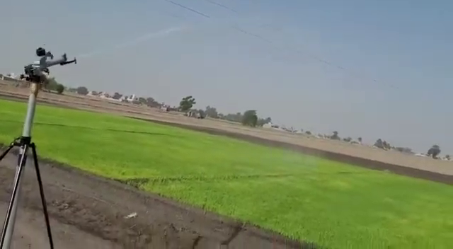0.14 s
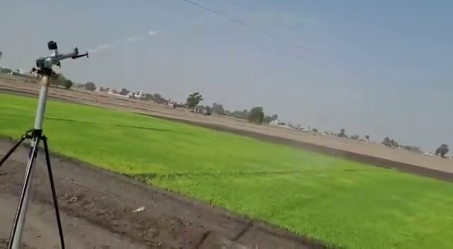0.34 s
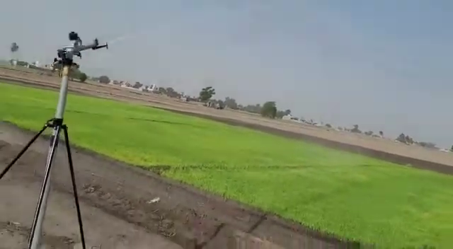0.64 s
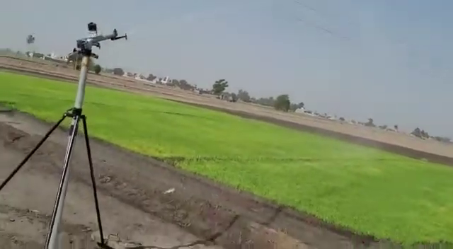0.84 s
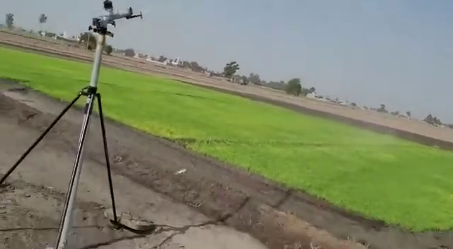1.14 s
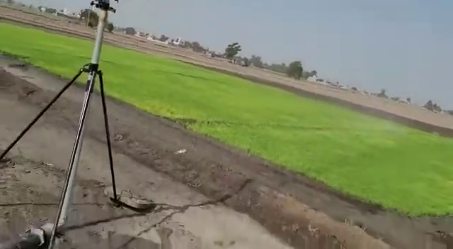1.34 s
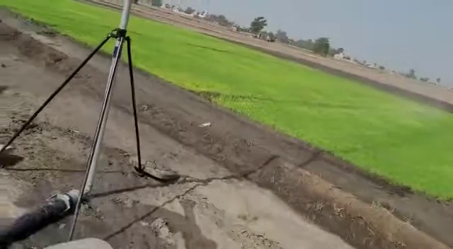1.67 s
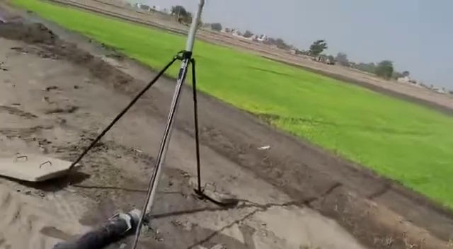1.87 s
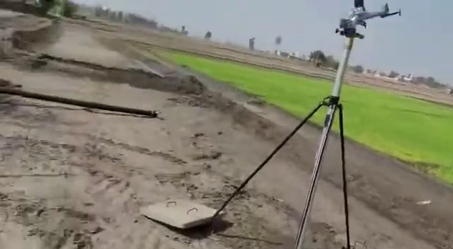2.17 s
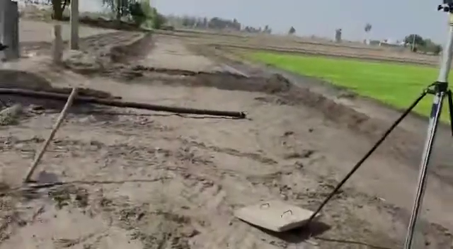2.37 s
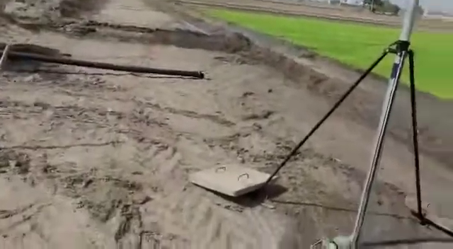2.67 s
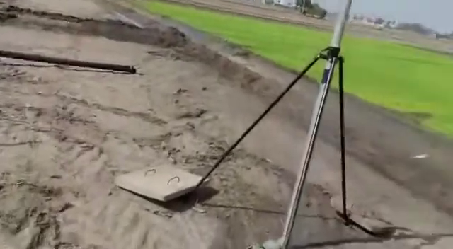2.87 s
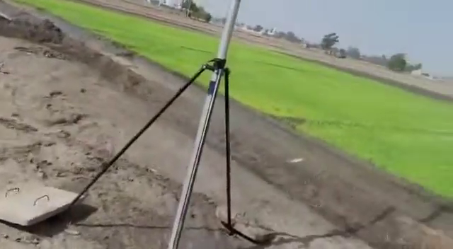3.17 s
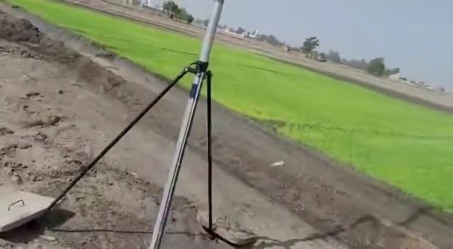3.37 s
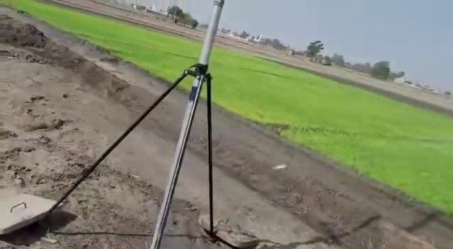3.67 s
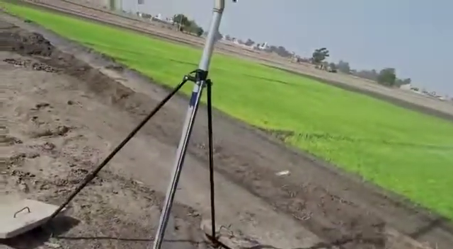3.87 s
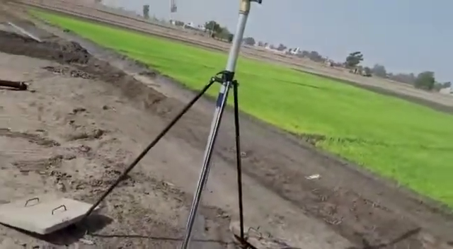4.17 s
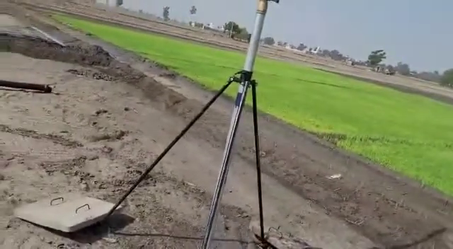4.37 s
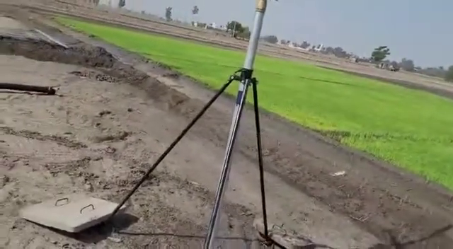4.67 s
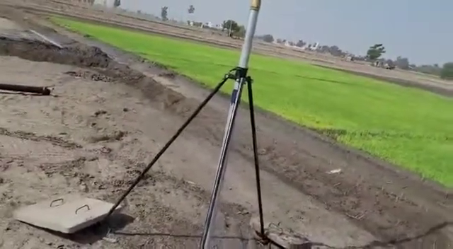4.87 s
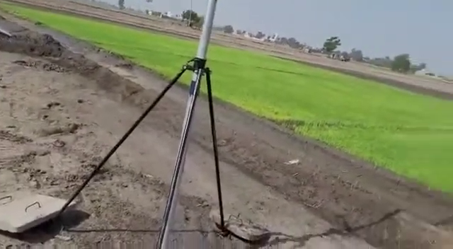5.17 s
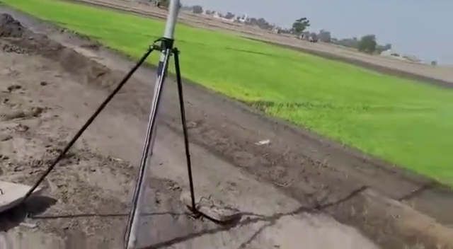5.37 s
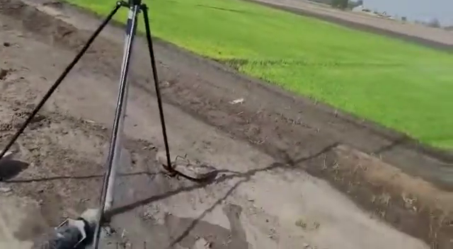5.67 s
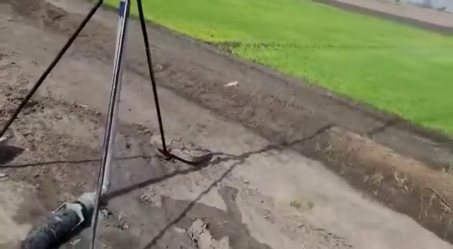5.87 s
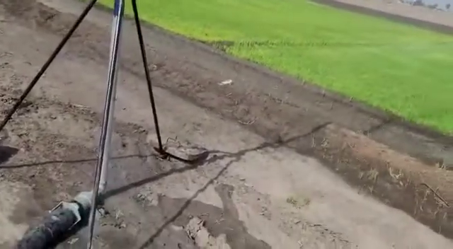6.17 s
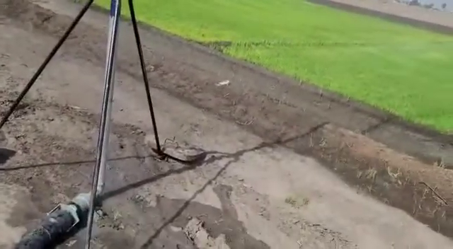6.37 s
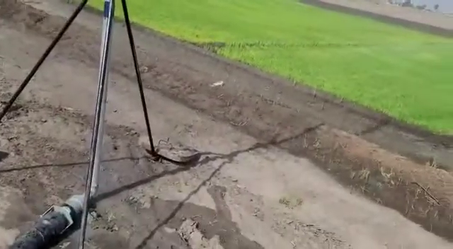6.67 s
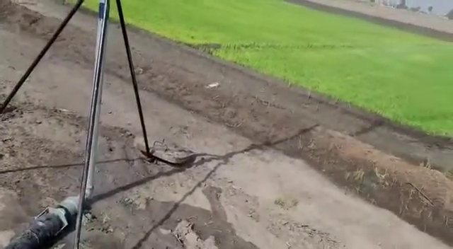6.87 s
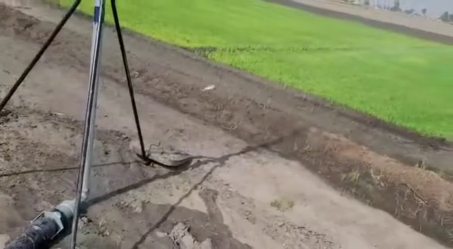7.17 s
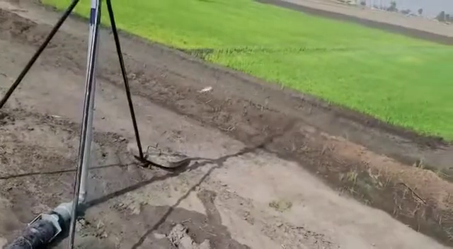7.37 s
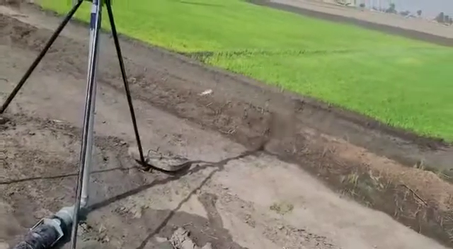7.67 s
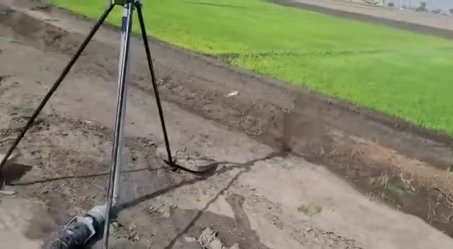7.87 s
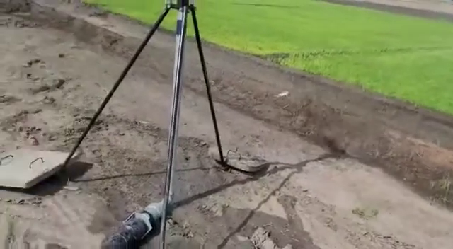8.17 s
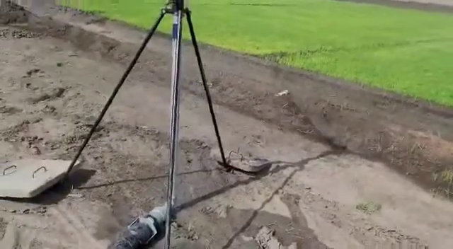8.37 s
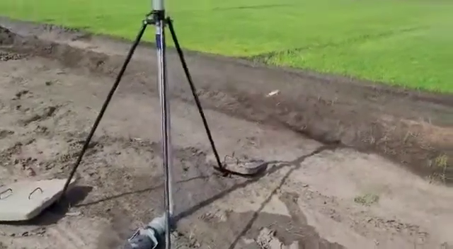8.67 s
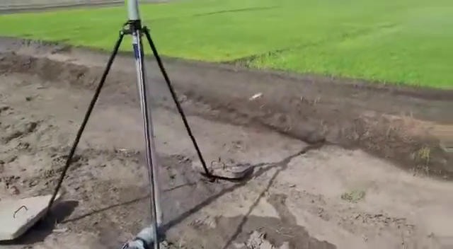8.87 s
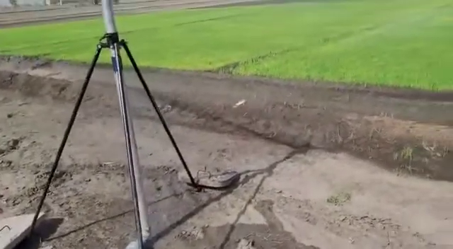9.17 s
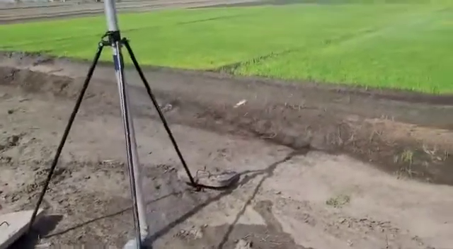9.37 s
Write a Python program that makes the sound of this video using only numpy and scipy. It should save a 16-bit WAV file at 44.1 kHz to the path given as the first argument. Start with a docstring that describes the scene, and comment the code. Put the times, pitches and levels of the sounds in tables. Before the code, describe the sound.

Outdoors in an open field, a handheld phone catches lumpy low wind and dull thumping buffets. A sprinkler's metal arm strikes its water jet about twice a second, each blow a splash, short clack and brief ring, over a growing, crackling hiss. At about seven seconds it breaks into quick chatter, ten blows a second with watery swishes between, then stops; a last gust and one loud slow clack follow.

```python
"""Rain gun in a windy field

Gusty wind buffets a two-port phone: layers of lumpy low noise, with dull thumps for the hardest buffets.
The water jet hisses (flickering noise in three bands) and spits (ticks a few cycles long).
A metal arm strikes the jet twice a second: a noise splash, a short barrel clack and a longer ring.
Then the gun swings back and the blows come ten times a second, with swishes between them."""
import sys
import numpy as np
from scipy import signal
from scipy.fft import rfft, irfft, next_fast_len
from scipy.io import wavfile
from scipy.ndimage import uniform_filter1d, map_coordinates

SR = 44100
rng = np.random.default_rng(int(sys.argv[2]) if len(sys.argv) > 2 else 0)


def transcribe(signal):
    """Save signal, clipped to [-1, 1], as a 16-bit WAV file at the path in sys.argv[1]."""
    frames = np.atleast_2d(signal).T
    limited = np.clip(frames, -1, 1)
    pcm = np.round(limited * 32767).astype(np.int16)
    wavfile.write(sys.argv[1], SR, pcm)


N = 420706  # samples in the scene

# blows of the arm, levels before the trims in the code: [t/s, splash level of the middle/dB, of the bass/dB,
# of the treble/dB, lead of the left port in the two lowest arm modes/rad (2 columns),
# level of the five arm modes/dB (5 columns), level of the nine lower barrel modes/dB (9 columns)]
BLOW_TABLE = [(0.198, -27.5, -33, -37, 2.7, 2.0, -45, -36, -43, -51, -46, -46, -46, -37, -45, -46, -36, -53, -41, -37.5),
              (0.715, -27.5, -29.5, -31, -0.5, 1.6, -43, -38, -42, -50, -53, -40, -48, -38, -44, -45, -42, -51, -54, -37),
              (1.232, -25.5, -33, -32, 1.3, -3, -35, -44, -38.5, -51, -55, -34.5, -38, -43, -49, -51, -40, -48, -50, -41),
              (1.749, -23, -21, -33, -0.5, 1.3, -36.5, -34.5, -42, -46, -47, -32, -45, -28.5, -38, -40, -38, -46, -36, -42),
              (2.268, -21, -19.5, -36, -1.7, 1.7, -43, -40, -37, -45, -51, -29, -32, -24, -41, -48, -34, -34, -38, -37),
              (2.789, -21.5, -21, -26, 1, -2.5, -48, -39, -35, -44, -52, -34, -30, -27, -40, -38, -40, -44, -40, -37),
              (3.311, -19, -21, -28, 0, -0.4, -34.5, -33, -35, -48, -39.5, -31.5, -44, -35, -38, -31, -30, -48, -37, -39),
              (3.833, -16.5, -21.5, -25, 0.5, -1, -36.5, -33, -43, -37, -55, -42, -43, -33, -34, -27.5, -27, -39, -33, -35),
              (4.356, -19, -21.5, -34, -1.6, 4, -32.5, -37, -34, -36, -36.5, -35, -35, -31, -40, -38, -21.5, -37, -24, -32),
              (4.878, -17, -20.5, -24, 0.1, -3.5, -27.5, -35, -41, -36, -41, -33, -35, -32, -41, -35, -31, -43, -38, -21.5),
              (5.399, -19.5, -24, -25, 1.0, 3.5, -27.5, -34, -39, -37.5, -46, -38, -32, -36, -37, -31.5, -30, -37, -51, -37),
              (5.924, -19, -20.5, -24.5, 2, 0.4, -27.5, -45, -49, -43, -39, -30.5, -38, -43, -37, -41, -29, -26, -39, -25),
              (6.447, -19, -22, -20.5, 2.0, 5, -27.5, -41, -50, -47, -43, -37, -33, -47, -44, -29.5, -25, -34, -37, -35),
              (6.968, -19, -22, -20, 3, 2, -29, -30, -50, -36, -47, -40, -37, -42, -35, -29, -29, -34, -40, -44),
              (6.998, -23, -35, -34, 2.3, 4, -26, -36, -53, -48, -57, -42, -50, -52, -49, -45, -40, -41, -51, -51),
              (7.007, -28, -29, -31, 2.4, 3.5, -26, -31, -56, -42, -52, -39, -47, -47, -44, -44, -43, -45, -50, -54),
              (7.127, -19.5, -26.5, -30, 2.4, 2.2, -24, -33, -48, -48, -57, -32, -37, -45, -34, -25.5, -33, -21, -40, -50),
              (7.229, -20.5, -26.5, -30, 3.5, 2.5, -26, -28.5, -50, -52, -36, -32, -47, -37, -36, -29, -40, -23, -30, -43),
              (7.332, -22.5, -26, -31, 3, 3, -30, -37, -56, -51, -45, -34, -44, -42, -35, -30, -43, -40, -32, -47),
              (7.431, -25, -26.5, -25, 3.5, 4, -33, -45, -44, -50, -43, -31, -44, -32, -37, -31, -44, -40, -41, -43),
              (7.533, -25, -29.5, -28, -2.5, -1, -36, -47, -44, -52, -44, -33.5, -37, -36, -38, -28, -47, -44, -36, -40),
              (7.633, -30, -27, -27, -1.5, 5, -42, -49, -47, -51, -52, -33, -38, -29.5, -39, -36, -49, -42, -39, -40),
              (7.736, -25.5, -27.5, -23.5, 1.5, 4, -42, -44, -47, -51, -53, -34, -38, -28, -36, -38, -47, -46, -42, -47),
              (7.836, -26, -26, -26.5, 0.4, 1.3, -44, -52, -45, -53, -50, -41, -40, -26, -38, -41, -47, -47, -46, -44),
              (7.933, -26.5, -26.5, -27, 0.1, -7, -44, -46, -44, -45, -49, -37, -34, -28, -32, -36, -48, -49, -43, -40),
              (8.032, -25.5, -25, -28.5, 1, 0.4, -41, -48, -51, -46, -48, -39, -30, -23.5, -26, -40, -45, -41, -46, -38),
              (8.134, -24.5, -30, -25.5, -1, 0.0, -47, -47, -51, -47, -44.5, -35, -27.5, -24, -27.5, -42, -44, -46, -48, -40),
              (8.235, -23, -26.5, -30, -3, -1, -47, -41.5, -50, -45, -50, -39, -29.5, -22, -25, -32, -44, -40, -48, -43),
              (8.335, -22.5, -24.5, -28, 2.8, -0.6, -49, -48, -45, -55, -56, -34, -30, -28, -20.5, -35, -41, -33, -37, -33),
              (8.439, -26.5, -26, -28, -1.7, -5.9, -41, -32.5, -33, -40, -54, -33, -25, -25, -29, -34, -35, -37, -48, -45),
              (8.545, -19.5, -31, -31, 0, -0.9, -40, -42, -41, -47, -51, -38, -26, -28, -27, -39, -32, -32, -41, -49),
              (8.551, -23, -27, -32, -2, -0.4, -44, -47, -41, -50, -55, -40, -42, -25, -21, -28, -38, -41, -44, -49),
              (9.2, -17, -17.5, -28, -0.9, 0.5, -31, -32, -31, -37, -46, -27.5, -28, -12.5, -27, -38, -51, -40, -35, -36)]
# colour of the splash: [f/Hz, level per Hz/dB]
SPLASH_COLOUR = [(290, -29), (500, -1.5), (1400, -3), (3700, -0.5), (4400, -2), (5630, -2.5), (7100, -9.5),
                 (7640, -3.5), (10400, -7), (16000, 0.5)]
# the jet before its flicker: [t/s, level of the low band/dB, level of the middle band/dB]
JET_LEVELS = [(0, -64.5, -59), (1.0, -61.5, -58.5), (2.05, -60.5, -56), (2.8, -56.5, -57.5),
              (3.15, -59, -51), (3.6, -57.5, -53), (4.8, -57.5, -54), (5.05, -51.5, -49.5), (5.6, -53, -53),
              (6.06, -54.5, -51), (6.9, -56.5, -51.5), (7.1, -41, -42), (7.62, -45, -42), (7.95, -44, -51),
              (8.25, -45, -58), (8.45, -43, -39), (8.8, -53, -54.5), (9.54, -52, -55)]
# colour of the hiss: [f/Hz, level per Hz/dB]
HISS_COLOUR = [(350, -46), (600, -35), (688, -18), (801, -6.5), (858, -9), (1210, -8), (1370, -14.5),
               (1660, -8), (2680, -12.5), (4580, -5.5), (6120, -4.5), (7410, 1), (16000, 13.5)]
# the hardest buffets of wind, before the trims in the code:
# [t/s, level/dB, f/Hz, level of the sharp edge/dB, left-right (held within 9)/dB]
BUFFET_TABLE = [(0.062, -11, 292, -26, -2), (0.116, -15.5, 238, -48, -11), (0.208, -12, 316, -27, -12),
                (0.293, -20, 320, -28, 9), (0.373, -7.5, 269, -24.5, -2.5), (0.455, -16.5, 245, -33, -7),
                (0.541, -15, 180, -34, 0), (0.587, -26, 130, -25.5, -3), (0.689, -19, 122, -19, 0),
                (0.729, -18, 144, -28, 10), (0.799, -12.5, 229, -29, -2), (0.847, -17, 129, -27, -12),
                (0.923, -19, 378, -22.5, 12), (0.982, -10.5, 290, -19.5, 5), (1.067, -6.5, 264, -45, 0),
                (1.233, -7, 293, -21.5, -3), (1.278, -21, 170, -35, 0), (1.368, -23, 300, -18.5, 0),
                (1.533, -18.5, 160, -14.5, 2.5), (1.568, -18, 340, -30, -11), (1.68, -22, 156, -25.5, 8),
                (1.78, -11.5, 262, -43, 9), (1.968, -21.5, 200, -39, 3), (2.242, -16, 266, -38, 2),
                (2.403, -11, 423, -32, 8), (2.519, -18.5, 167, -44, -5), (2.945, -12, 253, -30.5, 10),
                (3.086, -4.5, 344, -20, 0), (3.199, -19, 238, -23.5, 5), (3.355, -15.5, 350, -27.5, 7),
                (4.383, -23, 133, -33, -12), (4.95, -18.5, 253, -42, 9), (5.307, -15.5, 273, -27.5, 2),
                (5.318, -28, 80, -50, -4), (5.406, -13, 247, -24, -2), (5.42, -21, 76.6, -50, 0),
                (5.479, -33, 90.5, -52, 7), (5.763, -21, 85, -31, -5), (6.018, -14, 320, -28.5, -3),
                (7.269, -31.5, 70, -58, 4), (8.2, -30, 150, -50, 1), (8.743, -14, 400, -33, 4),
                (8.832, -15, 480, -42, 5), (8.867, -2.5, 417, -31, 2), (8.884, -12, 300, -40, 2),
                (8.91, -5, 310, -52, 13), (8.988, -11.5, 415, -50, 11), (9.089, -19.5, 380, -42, 9)]

SWEEP_S = 0.047  # length of a swish of the arm through the jet, s
REBOUND_S = 0.0043  # the arm knocks again this long after half of the push, s
SIDE = np.array([[1], [-1]])  # left port, right port


def gain_of(db):
    """Turns decibels into a factor."""
    return 10 ** (np.asarray(db) / 20)


def evened(x):
    """Scales to rms 1."""
    return x / np.sqrt(np.mean(x ** 2) + 1e-20)


def read(points, hz):
    """Reads a spectrum on a log-frequency axis."""
    f, value = np.transpose(points)
    return np.interp(np.log(hz + 1), np.log(f + 1), value)


def follow(points, t):
    """Reads a two-column table at time t, with straight lines between its points."""
    return np.interp(t, *np.transpose(points))


def add(mix, s, sound):
    """Lays a sound into the mix at time s."""
    part = mix[..., max(round(s * SR), 0):][..., :sound.shape[-1]]
    part += sound[..., :part.shape[-1]]


def coloured(x, db_at):
    """Filters by a gain in dB given as a function of Hz."""
    size = next_fast_len(x.shape[-1])
    gain = gain_of(db_at(np.fft.rfftfreq(size, 1 / SR)))
    return irfft(rfft(x, size) * gain, size)[..., :x.shape[-1]]


def share(hz, edge_hz):
    """Smooth step from 0 below the edge to 1 above it."""
    return 1 / (1 + (edge_hz / (hz + 1)) ** 6)


def wobble(width):
    """Random drift of rms 1 that changes within `width` seconds."""
    size = round(width * SR)
    return evened(uniform_filter1d(uniform_filter1d(rng.standard_normal(N), size), size))


def spray(length, spectrum):
    """Noise in three rows: common to both ports, own to the left, own to the right; rms 1 at a port."""
    # how much of the spray differs between the ports: [f/Hz, share 0-1]
    apart = [(1000, 0.28), (3000, 0.6), (8000, 0.73), (15000, 1)]

    def common_db(hz):
        return read(spectrum, hz) + 10 * np.log10(np.clip(1 - read(apart, hz), .01, 1))

    def own_db(hz):
        return read(spectrum, hz) + 10 * np.log10(np.clip(read(apart, hz), .01, 1))

    noise = rng.standard_normal((3, length))
    rows = np.vstack([coloured(noise[:1], common_db), coloured(noise[1:], own_db)])
    return rows / np.sqrt((rows[:2] ** 2).sum(0).mean())


def in_bands(z, hz, low_hz, high_hz, levels_db):
    """Splits short-time spectra of rms 1 in three bands and gives each band its rms level."""
    low, high = 1 - share(hz, low_hz), share(hz, high_hz)
    power = (abs(z) ** 2).mean((0, 2))
    masks = [low, 1 - low - high, high]
    # twice the dB, because these are power gains
    gains = [m[:, None] * gain_of(2 * db) * power.sum() / (m @ power) for m, db in zip(masks, levels_db)]
    return z * np.sqrt(sum(gains))


def surges():
    """Quick surges in dB that all wind layers share: random drift, and a swell with each hard buffet."""
    swell_s, swell_db = .035, 6
    struck = np.zeros(N)
    for s, *_ in BUFFET_TABLE:
        add(struck, s - swell_s / 4, signal.windows.tukey(round(swell_s * SR), .6))
    struck = np.minimum(struck, 1)
    swell = struck - uniform_filter1d(struck, size=SR // 4)
    return 2.68 * np.tanh(wobble(0.025)) + swell_db * swell


def eddies():
    """Eddies break on each port: lumpy low noise, the lumps and a little of the pressure shared."""
    # gusts and lulls, before surges and layer offsets:
    # [t/s, level of the rumble/dB, level of the flutter/dB, left-right before its drift/dB]
    gusts = [(0.0, -44, -44, -9), (0.1, -41, -35.5, 3), (0.9, -38, -37, 0.5), (1.64, -43, -40, 3),
             (1.8, -33.5, -35, 2.5), (1.91, -53, -59, -3), (1.99, -41.5, -37.5, 4), (2.2, -56.5, -61, -3),
             (2.26, -41.5, -49, -1.5), (2.31, -48, -53, 2), (2.44, -38.5, -36.5, 2.5), (2.68, -37, -42, -1),
             (2.71, -50, -56, 8), (2.84, -38.5, -37.5, -6), (2.92, -44.5, -45.5, 0),
             (3.11, -34.5, -30.5, 4), (3.45, -50, -57.5, -9.5), (3.64, -59.5, -75, 19),
             (3.9, -77, -65.5, -8), (4.06, -51, -59, -12), (4.25, -47, -57, 8), (4.33, -56, -71, 3),
             (4.38, -39, -40.5, 0.5), (4.67, -46, -55.5, 4), (4.75, -39.5, -41, -2), (5.47, -44, -60, 2),
             (5.61, -58, -56.5, -9), (5.69, -74, -50, 6.5), (5.77, -39, -43, -2.5), (6.35, -61.5, -77, 3),
             (7.49, -71, -53.5, 3), (8.05, -50, -53, -5.5), (8.77, -49, -37, 6), (8.87, -36, -39.5, -7),
             (9.03, -47.5, -39, 5), (9.54, -45, -36.5, 0)]
    # colour of the wind: [f/Hz, level per Hz/dB]
    gust_colour = [(15, -66), (25, -2.5), (117, -0.5), (189, -4), (273, -0.5), (477, -4.5), (601, -11),
                   (834, -11.5), (1730, -29), (2500, -40), (3250, -94), (5500, -120)]
    # layers of the wind: [from f/Hz, to f/Hz, lumpiness (scales the lumps)/dB,
    # share of the flutter in its level 0-1, offset/dB, own drift/dB]
    layers = [(46.4, 61, -1.5, 0.01, -3, 1), (107.5, 202, 4.5, 0, -1.5, 1.5), (276, 476, 6, 0.86, -4, 2.5),
              (550, 9000, 5.5, 1, -10, 1.5)]
    s, *columns = np.transpose(gusts)
    rumble_db, flutter_db, pan_db = (np.interp(np.arange(N) / SR, s, c) for c in columns)
    surge_db = surges()
    levels_db = [surge_db + rumble_db + part * (flutter_db - rumble_db) + db + drift_db * np.tanh(wobble(0.053))
                 for *_, part, db, drift_db in layers]
    pan_db = pan_db + 2.5 * wobble(0.076)  # the wind wanders between the ports
    shared_lumps, push = wobble(0.01), rng.standard_normal(N)
    out = np.zeros((2, N))
    for k in range(2):
        lumps = 1.9 * np.tanh((.8 * shared_lumps + .6 * wobble(.006)) / 1.5)
        noise = rng.standard_normal(N) + SIDE[k] * push * .45  # shared pressure, opposite in sign
        noise += 12 * rng.standard_normal(N) * (rng.random(N) < 110 / SR)  # single eddies pop
        for level_db, (lo_hz, hi_hz, lumpy_db, *_) in zip(levels_db, layers):
            def layer_db(hz):
                band_power = share(hz, lo_hz) * (1 - share(hz, hi_hz))
                return read(gust_colour, hz) + 10 * np.log10(band_power + 1e-9)
            band = coloured(noise * gain_of(lumpy_db * lumps), layer_db)
            out[k] += gain_of(level_db) * evened(band)
    return out * gain_of(SIDE * np.clip(pan_db, -9, 9) / 2)


def buffets():
    """The hardest buffets: a low thump that dies within a few cycles, and a sharp noisy edge."""
    out, t = np.zeros((2, N)), np.arange(1500) / SR

    def edge_colour_db(hz):
        return 20 * np.log10(share(hz, 766) * (1 - share(hz, 784)) + 1e-5)

    for s, db, hz, edge_db, pan_db in BUFFET_TABLE:
        turn = rng.random((2, 1))  # each port starts anywhere in the cycle
        thump = gain_of(db) * np.sin(2 * np.pi * (hz * t + turn)) * np.exp(-t * hz / 1.4)
        thump = thump * (1 - np.exp(-t / 0.0071))
        edge = gain_of(edge_db) * evened(coloured(rng.standard_normal((2, len(t))), edge_colour_db))
        edge = edge * np.exp(-t / 0.006) * (1 - np.exp(-t / 0.0015))
        add(out, s, gain_of(SIDE * np.clip(pan_db, -9, 9) / 2) * (thump + edge / 2))
    return out


def wind():
    """Wind pressing on the ports: eddies all along, and the hardest buffets on top."""
    return np.sqrt(2) * (eddies() + buffets())  # eddy levels are those of the mean of two unrelated ports


def sweeps():
    """(s of the middle, dB) of the arm's sweep back through the jet after each quick blow."""
    # the quick swing back: [from t/s, to t/s]
    quick_swing = (7, 8.6)
    # loudness of the sweeps, before their fade and grain: [t/s, level/dB]
    sweep_level = [(7.1, -38), (7.7, -37), (8.1, -38), (8.35, -33), (8.62, -32)]
    delay_s = .072
    s = np.array([row[0] + delay_s for row in BLOW_TABLE if quick_swing[0] < row[0] < quick_swing[1]])
    s = s[np.diff(s, prepend=0) > SWEEP_S / 2]  # a bounce makes no sweep of its own
    return zip(s, follow(sweep_level, s))


def jet():
    """Hiss whose roar, body and fizz drift, with uneven, flickering loudness."""
    # the treble fizz before its flicker: [t/s, level/dB]
    fizz = [(0, -56.5), (2, -52), (3, -49.5), (3.5, -53), (4.7, -46), (5.3, -52.5), (6.1, -46),
            (6.9, -48.5), (7.1, -46), (7.7, -47.5), (8.1, -43), (8.5, -49), (8.85, -49), (9.54, -51)]
    hz, t, z = signal.stft(spray(N, HISS_COLOUR), SR, nperseg=256, noverlap=192)
    s, *columns = np.transpose(JET_LEVELS)
    levels_db = [np.interp(t, s, c) for c in columns] + [follow(fizz, t)]
    z = in_bands(z, hz, 3160, 5360, levels_db)
    unevenness = rng.standard_normal(z.shape[1:])
    unevenness = evened(uniform_filter1d(uniform_filter1d(unevenness, 3, 0), 30, 1))
    flicker = np.interp(t, np.arange(N) / SR, 1.13 * wobble(0.01) + 2.67 * wobble(0.00057))
    for s, _ in sweeps():  # the hiss dips between a sweep and the next blow
        flicker = flicker - 6.0 * np.exp(-((t - s - 0.52 * SWEEP_S) / 0.006) ** 2)
    # short bursts of spray as the jet sputters: 30 per second on average, each dying over three frames
    puffs = rng.exponential(1, len(t)) * (rng.random(len(t)) < 30 * 64 / SR)
    puffs = np.minimum(np.convolve(puffs, [1, .6, .25])[:len(t)], 2)
    reach = uniform_filter1d(rng.standard_normal(z.shape[1:]), size=40, axis=0) > 0  # part of the treble
    puff_db = 6 * puffs * reach * share(hz, 3000)[:, None]
    flicker_db = flicker * (0.48 + 0.57 * share(hz, 4300)[:, None])  # the treble flickers more
    z = z * gain_of(puff_db + 2 * unevenness + flicker_db)
    return signal.istft(z, SR, nperseg=256, noverlap=192)[1][:, :N]


def spits():
    """Air pockets snap at the nozzle: few-cycle ticks, many small and a few large."""
    # the loudest spits, before their decay: [t/s, level/dB, f/Hz]
    large_spits = [(1.845, -33, 5300), (2.694, -31, 7740), (3.1004, -26.5, 7100), (3.6156, -29.5, 7300),
                   (3.6866, -27, 7400), (3.7, -28, 4980), (3.811, -35, 4770), (4.045, -30, 4630),
                   (4.243, -30.5, 11800), (4.501, -22, 10700), (4.8492, -28, 5190), (4.97, -31, 8500),
                   (5.037, -35, 5300), (5.117, -35, 8000), (5.16, -34, 7500), (5.233, -33, 7800),
                   (5.327, -24, 8200), (5.338, -26, 9000), (5.357, -22.5, 8450), (5.602, -27, 11900),
                   (5.8615, -24, 11500), (6.1385, -26.5, 7700), (6.2426, -24, 11600), (6.698, -23.5, 7700),
                   (6.895, -21.5, 11500)]
    out, t = np.zeros((3, N)), np.arange(200) / SR
    level = gain_of(np.interp(np.arange(N) / SR, *np.transpose(JET_LEVELS)[::2]))  # follows the middle band
    for hz in np.geomspace(3500, 14000, num=10):
        sizes = gain_of(3.3 * np.minimum(rng.exponential(1, N), 4))
        train = sizes * (rng.random(N) < 25 / SR)  # 25 per second at each pitch, on average
        tick = np.sin(2 * np.pi * hz * t) * np.exp(-t * hz / 1.2)
        out[0] += gain_of(-28) * signal.oaconvolve(train * level, tick)[:N]
    t = np.arange(600) / SR
    for s, db, hz in large_spits:
        snap = np.sin(2 * np.pi * hz * t) * np.exp(-t * hz / 4.1) * [[1], [0], [0]]
        puff = 0.29 * spray(len(t), HISS_COLOUR) * np.exp(-t / 0.0071)
        add(out, s, gain_of(db) * (snap + puff))
    return out


def splash(t, bands_db, push, swing, body_hz):
    """A burst of spray that is held during the push, then dies band by band, roughened by chatter."""
    # time for the splash to fall 60 dB: [f/Hz, time/s]
    splash_t60 = [(800, 0.12), (3000, 0.099), (8000, 0.12), (15000, 0.15)]
    hz, frames, z = signal.stft(spray(len(t), SPLASH_COLOUR), SR, nperseg=256, noverlap=224)
    hold = push * (1 - .85 * share(hz, 3300))[:, None]  # the treble lasts 0.15 of the push
    after = np.maximum(frames - .015 - hold, 0) / read(splash_t60, hz)[:, None]
    hump_db = 2.5 * np.exp(-(np.log2((hz + 1) / body_hz) / 0.31) ** 2)
    luck_db = 2.5 * evened(uniform_filter1d(rng.standard_normal(len(hz)), size=2))  # no two blows alike
    z = z * gain_of(luck_db + hump_db)[:, None]
    z = in_bands(z, hz, 1870, 8400, bands_db) * gain_of(-3.0 - 60 * after)
    late, again = np.maximum(t, 0), np.maximum(t - REBOUND_S - push / 2, 0)
    # after a long swing the spoon ploughs water before the stop
    plough = gain_of(-19.5 + 13.0 * swing) * np.exp(t / 0.0033)
    rise = np.where(t < 0, plough, 1 - 0.79 * swing * np.exp(-late / 0.0011))
    knocks = (rng.random(len(t)) < 600 / SR) * rng.uniform(0, 1, len(t))  # loose joints chatter
    chatter = .6 * np.convolve(knocks, np.exp(-np.arange(120) / 35))[:len(t)]
    crack = .6 + chatter + (.6 - .2 * swing) * np.exp(-abs(t - .001) / .003)
    crack = crack + 0.94 * (again > 0) * np.exp(-again / 0.0036)  # the second knock
    return signal.istft(z, SR, nperseg=256, noverlap=224)[1][:, :len(t)] * rise * crack


def arm_ring(t, rings_db, leads, swing):
    """Long metal modes, each with a close twin that beats against it; one row per port."""
    # long modes of the arm: [f/Hz, time to fall 60 dB after a full slow swing/s, distance to the twin/Hz,
    # size of the twin 0-1, bend of the fall (1 is even, 2 holds first), left-right before luck/dB]
    arm_modes = [(2422, .165, 7, .15, 1.9, 1.5), (2769, .165, 11, .2, 1.7, -1), (3110, .11, 8, .2, 1.1, -1),
                 (3388, .125, 8, .2, 1.2, 0), (5422, .135, 25, .3, 1.7, 1)]
    late, half = np.maximum(t, 0), SIDE / 2
    ring = np.zeros((2, len(t)))
    leads = [*leads, *rng.normal([2.6, 1.6, .9], [1, .8, .5])]  # each mode beams its own way
    for (f, t60, twin, size, bend, pan_db), ring_db, lead in zip(arm_modes, rings_db, leads):
        turn = 2 * np.pi * rng.random() + np.array([0, rng.uniform(-1, 1)])
        pair = np.sin(2 * np.pi * f * late + turn[0] + half * lead)
        pair = pair + size * np.sin(2 * np.pi * (f + twin) * late + turn[1] + half * lead)
        t60 = t60 * (.8 + .2 * swing)  # a quick arm stays wetter
        # the water damps it ever faster; the fall is counted from 27 ms after the blow
        fall_db = 60 * ((late / t60) ** bend - (.027 / t60) ** bend)
        # water on the metal roughens the ring
        drip_db = 2.3 * evened(uniform_filter1d(rng.standard_normal(len(t)), size=350))
        side_db = half * (pan_db + 2.5 * rng.standard_normal())
        ring += gain_of(ring_db - fall_db + drip_db + side_db) * pair * (1 - np.exp(-late / .003))
    return ring


def barrel_clack(t, clanks_db, treble_db, push):
    """Short modes of the barrel, struck by the blow and again by the weaker rebound."""
    # short modes of the barrel: [f before a small random shift/Hz, time to fall 60 dB/s]
    barrel_modes = [(1020, .05), (1295, .055), (1565, .055), (1715, .07), (2000, .045), (3700, .06),
                    (4100, .08), (4850, .05), (5570, .06), (7480, .06), (8475, .07), (11445, .07)]
    # the three highest barrel modes against the treble splash: [level/dB]
    top_modes_db = [-12.5, -12.5, -11.5]
    late, again = np.maximum(t, 0), np.maximum(t - REBOUND_S - push / 2, 0)
    clack = np.zeros(len(t))
    for (f, t60), db in zip(barrel_modes, [*clanks_db, *(treble_db + np.array(top_modes_db))]):
        luck = rng.standard_normal(3)
        f = f * (1 + 0.0095 * luck[0])
        for since, knock_db, turn in [(late, 0, luck[1]), (again, -6, luck[1] + luck[2] / 6)]:
            ring = np.sin(2 * np.pi * (f * t + turn)) * (1 - np.exp(-since / 0.0011))
            clack += gain_of(db + knock_db - 5.0 - 60 * (since - .01) / t60) * ring
    return clack


def blow(bands_db, leads, rings_db, clanks_db, push, swing, body_hz):
    """One blow: a splash of water, with the barrel and the arm ringing after it."""
    t = np.arange(round(.35 * SR)) / SR - .015  # the blow lands at 0
    out = splash(t, bands_db, push, swing, body_hz)
    out[1:] += arm_ring(t, rings_db, leads, swing)
    out[0] += barrel_clack(t, clanks_db, bands_db[2], push)
    return out


def blows():
    """All blows; the longer the swing before one, the more it ploughs and the shorter its push."""
    # how long the spoon stays in the jet on a quick swing, longer as the gun slows: [t/s, push/s]
    quick_push = [(7.1, 0.0062), (8.35, 0.011), (8.55, 0.015)]
    # the loudest part of the barrel's clack moves as the gun turns; it lifts the splash here: [t/s, f/Hz]
    body_pitch = [(0, 1480), (6.5, 1160), (7.1, 960), (7.6, 1050), (8.0, 1550), (8.6, 1630), (9.2, 1480)]
    slow_push_s, slow_swing_s = 0.0023, .5  # push on a slow swing; time between blows at the slow pace
    out = np.zeros((3, N))
    swings = np.clip(np.diff(np.transpose(BLOW_TABLE)[0], prepend=-1) / slow_swing_s, 0, 1) ** 2
    for (s, db, low_db, top_db, *rest), swing in zip(BLOW_TABLE, swings):
        leads, rings_db, clanks_db = np.split(rest, [2, 7])
        push = swing * slow_push_s + (1 - swing) * follow(quick_push, s)
        sound = blow([low_db, db, top_db], leads, rings_db, clanks_db, push, swing, follow(body_pitch, s))
        add(out, s - .015, sound)
    return out


def rattles():
    """A soft dull rattle some way into the arm's slow swing: short spray without treble."""
    # the rattles, before their rise and decay: [t/s, level/dB]
    rattle_table = [(2.402, -40), (2.942, -46), (4.489, -47), (5.043, -46), (5.552, -35), (6.079, -48),
                    (6.566, -21), (6.596, -16.5)]
    out, t = np.zeros((3, N)), np.arange(2000) / SR
    for s, db in rattle_table:
        dull = coloured(spray(len(t), SPLASH_COLOUR), lambda hz: 20 * np.log10(1.001 - share(hz, 1140)))
        add(out, s, gain_of(db) * dull * np.exp(-t / 0.014) * (1 - np.exp(-t / 0.00091)))
    return out


def swishes():
    """The arm sweeps back through the jet after each quick blow: grainy noise that fades in and out."""
    # colour of the swish: [f/Hz, level per Hz/dB]
    swish_colour = [(290, -38), (500, -17), (784, -3), (1530, 12), (1870, -4), (2460, 7), (2980, 4),
                    (5240, -3.5), (7750, 10.5), (9090, -2), (16000, -0.5)]
    out, size = np.zeros((3, N)), round(SWEEP_S * SR)
    grain = gain_of(3 * wobble(.001) + 1.8 * wobble(.005))  # the sheet of water tears into drops
    for s, db in sweeps():
        swish = gain_of(db) * spray(size, swish_colour) * signal.windows.tukey(size, .55)
        add(out, s - SWEEP_S / 2, swish * grain[round(s * SR):][:size])
    return out


def arm():
    """Everything the arm does, with what lies below about 730 Hz filtered out."""
    out = blows() + rattles() + swishes()
    return coloured(out, lambda hz: 20 * np.log10(share(hz, 730) + 1e-4))


def ports(rows):
    """The common part reaches the ports at different times; ground and hand scatter a little more onto each."""
    # bearing of the gun as the phone turns: [t/s, time by which the left port lags/ms, left-right/dB]
    bearing = [(0, -0.19, 3.5), (.72, -0.12, 2), (1.75, -0.083, 1.5), (2.3, 0.27, .5), (2.8, 0.15, 0),
               (3.3, -0.035, 1), (4.36, 0.089, 0), (5.1, 0.032, 0.5), (5.5, -0.086, 0.5), (7.6, -0.14, 1),
               (8.449, -0.05, 0.8), (9.2, -0.3, 2.5), (9.54, -0.16, 0.5)]
    s, lag_ms, pan_db = np.transpose(bearing)
    t = np.arange(N)
    lag = SIDE * np.interp(t / SR, s, lag_ms) * SR / 2000  # in samples, half to each port
    direct = np.array([map_coordinates(rows[0], [t - d], order=3) for d in lag])
    taps = rng.standard_normal((2, 300)) * (rng.random((2, 300)) < .05) * np.exp(-np.arange(300) / 120)
    taps *= gain_of(-14) / np.linalg.norm(taps, axis=1, keepdims=True)
    heard = direct + signal.oaconvolve(direct, taps, axes=1)[:, :N] + rows[1:]
    return heard * gain_of(SIDE * np.interp(t / SR, s, pan_db) / 2)


def scene():
    """Gun and jet through the port pair, wind on top."""
    return wind() + ports(jet() + spits() + arm())


def record(dry):
    """The band limit: a steep filter takes away what lies above 15750 Hz."""
    low_pass = signal.firwin(511, 15750, window=("kaiser", 9), fs=SR)
    return signal.oaconvolve(dry, low_pass[None], "same")


dry = scene()
out = record(dry)
transcribe(out)
```